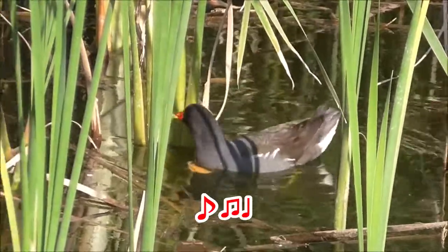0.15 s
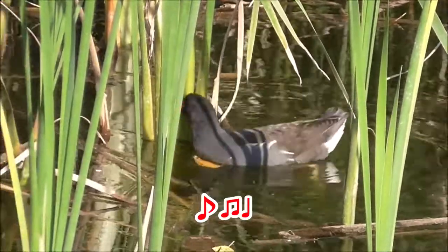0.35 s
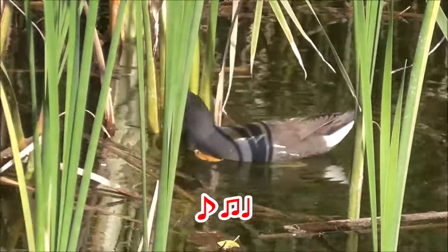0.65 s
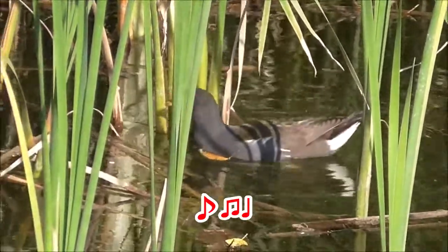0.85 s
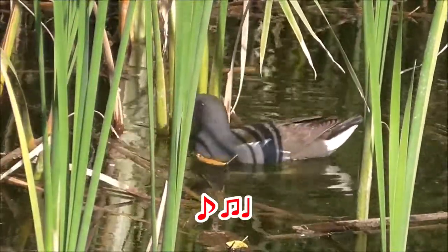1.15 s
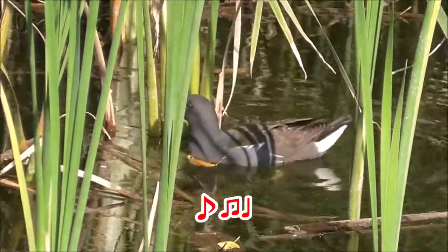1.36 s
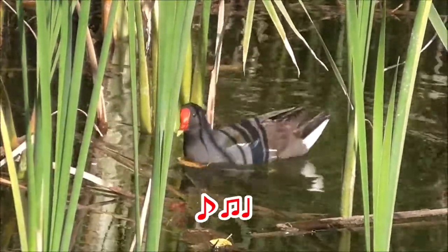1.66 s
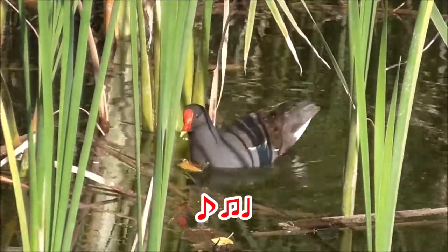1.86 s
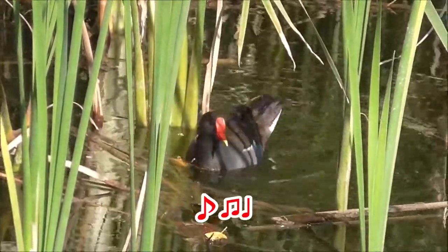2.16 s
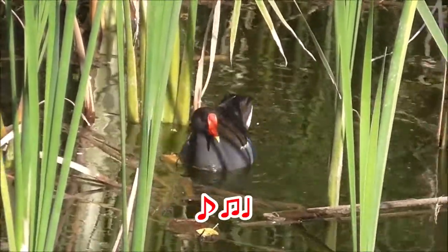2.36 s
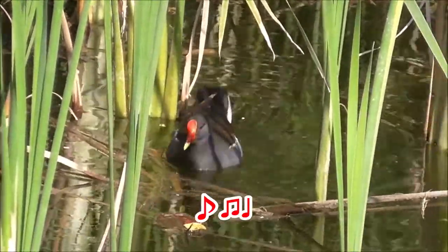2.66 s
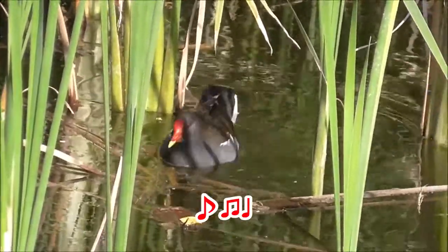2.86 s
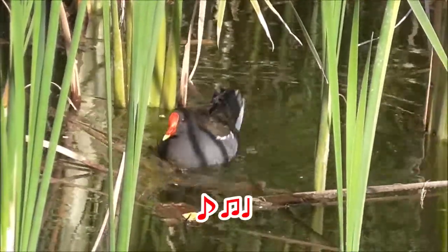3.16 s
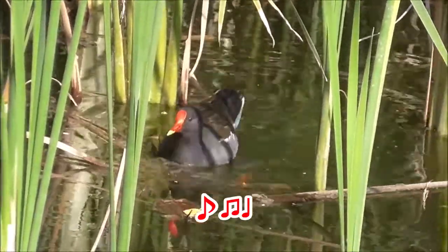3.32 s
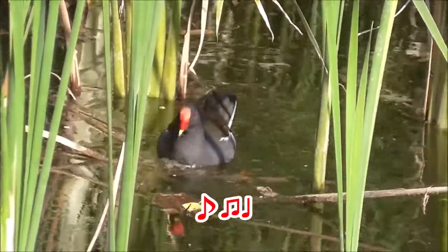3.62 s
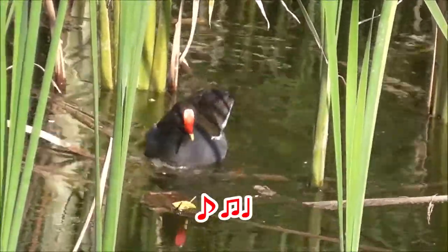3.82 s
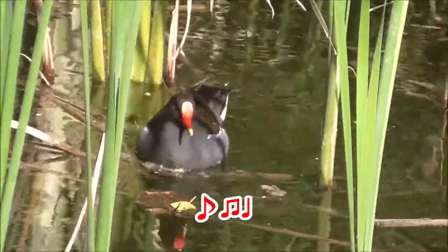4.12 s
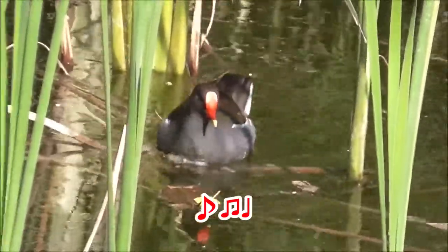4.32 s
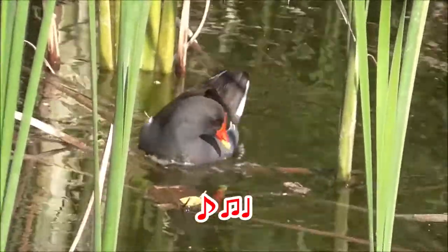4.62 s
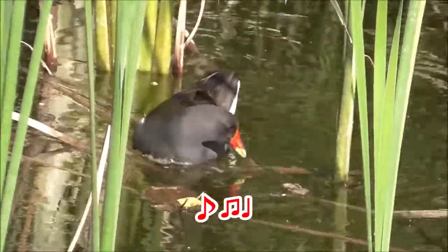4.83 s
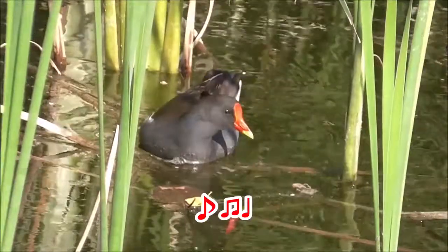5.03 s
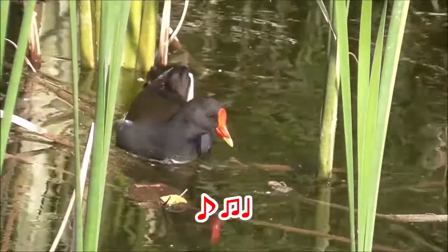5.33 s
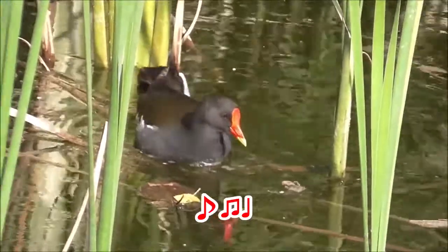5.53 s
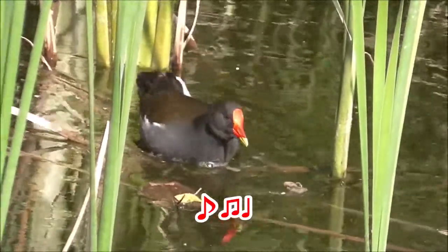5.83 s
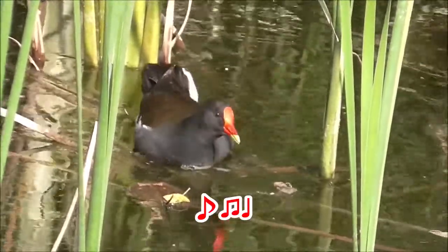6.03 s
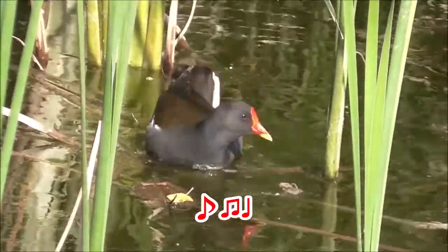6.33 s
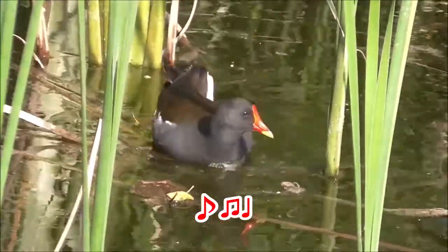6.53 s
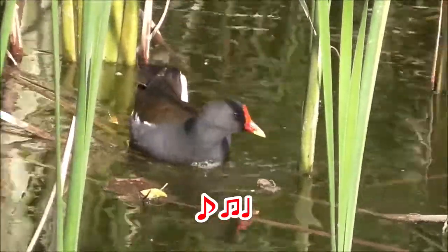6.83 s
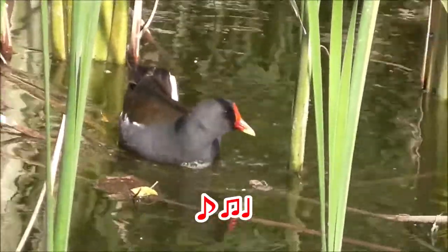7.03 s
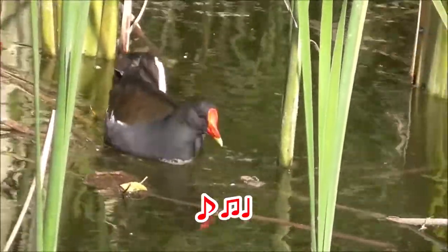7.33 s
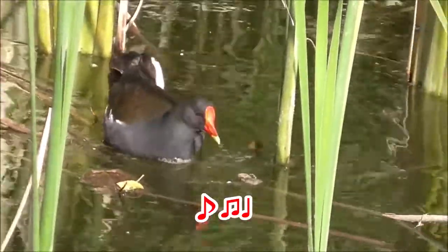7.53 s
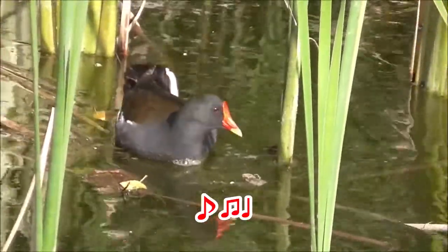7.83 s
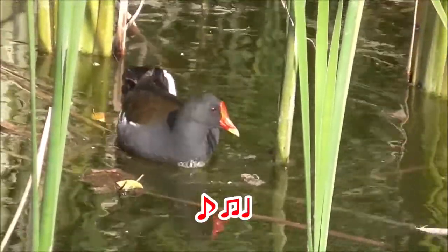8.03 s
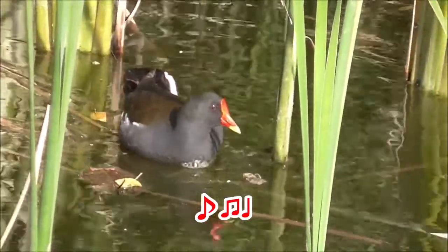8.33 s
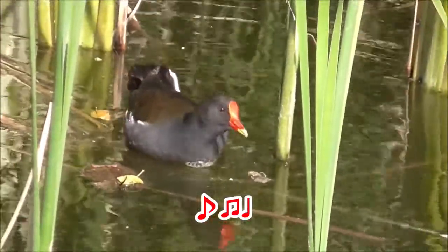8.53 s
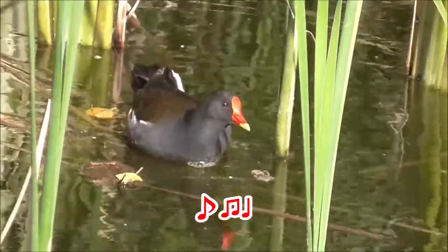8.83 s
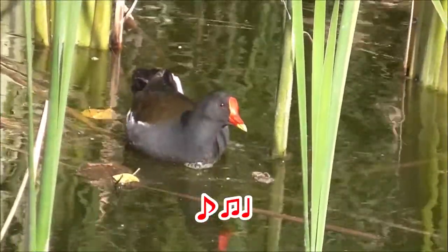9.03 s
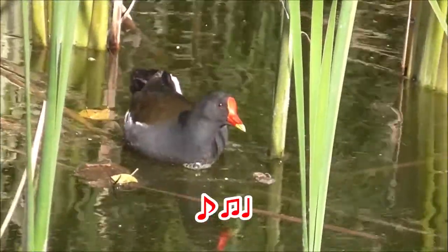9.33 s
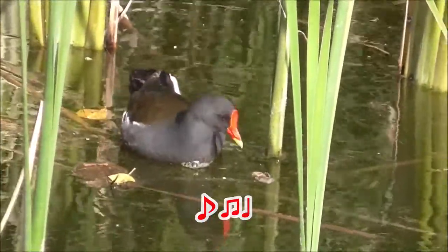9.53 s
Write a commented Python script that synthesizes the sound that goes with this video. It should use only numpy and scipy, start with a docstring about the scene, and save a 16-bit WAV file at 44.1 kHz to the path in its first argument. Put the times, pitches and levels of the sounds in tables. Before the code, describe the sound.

A reedy pond in open air, about 9.7 seconds, in stereo. Loud, steady insect hiss, strongest around 6-9 kHz, runs throughout over a soft low traffic murmur that slowly grows, with a faint wavering engine drone. Single crickets trill in overlapping stretches near 5-6 kHz, throbbing some thirty times a second. From 0.1 to 4.4 a small bird gives eighteen thin, arched whistles near 5 kHz, under a tenth of a second each, the first ones fainter. A close moorhen clucks, extremely short, throaty and upward-sliding, at 0.14, 1.74, 2.7, 2.97, 3.83, 4.56, 5.3, 6.02, 7.26 and 8.61; those at 3.83 and 4.56 push hardest, with brief hollow tails. Reeds scatter the calls slightly. Faint dry ticks come at 5.6 and 6.9. At 7.65 the camera takes a soft, low double knock with a tiny rattle. Insects and traffic continue to the end.

```python
"""A loud, steady insect chorus and a slowly growing murmur of far traffic, both shaped noise, run throughout.
Single crickets trill as throbbing tones, and at once a small bird starts a run of thin, arched whistles.
From the start to near the end a moorhen gives ten short clucks: a few uneven, upward-sliding cycles each.
After the song, two faint ticks of filtered noise come from the reeds, which also scatter the calls.
Late on, the camera takes a soft knock, made of short low tone bursts and a rattle of noise."""
import sys
import numpy as np
from scipy import signal
from scipy.fft import rfft, irfft, next_fast_len
from scipy.io import wavfile
from scipy.ndimage import uniform_filter1d

SR = 44100
rng = np.random.default_rng(int(sys.argv[2]) if len(sys.argv) > 2 else 0)


def inscribe(sig):
    """Save sig as 16-bit PCM at rate SR to the path in sys.argv[1].

    A 1-D sig is mono; a 2-D sig holds one channel per row.
    Samples are clipped to [-1, 1] before scaling.
    """
    pcm = np.round(np.clip(np.atleast_2d(sig).T, -1, 1) * 32767)
    wavfile.write(sys.argv[1], SR, pcm.astype(np.int16))


N = 426447

# Insect chorus, the balance of its noise: [pitch_hz, relative_level_db (per Hz)]
CHORUS_SPECTRUM = [(2900, -46), (3600, -39.5), (4300, -25), (5200, -15.5), (5750, -10), (6200, -5),
                   (7200, -4), (8000, 0.5), (8500, 0), (9300, -7), (10300, -16.5), (11200, -37.5),
                   (13200, -60), (15000, -33.5)]
# Far traffic, the balance of its noise: [pitch_hz, relative_level_db (per Hz)]
TRAFFIC_SPECTRUM = [(20, -33), (55, -12.5), (110, -5), (160, -4.5), (270, 0.5), (380, -4), (600, -3.5),
                    (850, -5), (1100, -10.5), (1500, -21), (2000, -27), (2800, -33), (5000, -42)]
# Drone of a far engine, its course over time: [time_s, pitch_hz, level_db]
DRONE_COURSE = [(0, 297, -47), (.4, 305, -44.5), (1.15, 306, -47), (2.1, 308, -64), (2.5, 313, -39),
                (2.9, 312, -57), (3.4, 310, -41.5), (3.8, 300, -54), (4.5, 291, -55), (5.3, 287, -49.5),
                (5.85, 291, -52), (6.6, 296, -54), (7.9, 309, -42.5), (8.3, 309, -50), (8.65, 298, -47),
                (9.05, 296, -44), (9.67, 298, -53)]
# How alike the two microphones hear far sounds: [pitch_hz, coherence (0-1)]
EAR_LIKENESS = [(50, .95), (600, .94), (1250, .72), (1700, .85), (2200, .55), (2900, .45), (4000, .82),
                (6000, .91), (7500, .82), (8300, .6), (8900, .32), (10000, .52), (11000, .75), (15000, .15)]
# How far the left microphone's waves run ahead of the right's: [pitch_hz, lead_radians]
LEFT_LEAD = [(100, 0), (800, -.25), (1500, -.05), (5000, .1), (7000, -.08), (8400, -.35), (8800, -.9),
             (9200, -1.8), (10500, -2.7), (11500, -2.9)]
# How much louder far sounds are on the left: [pitch_hz, left_minus_right_db]
SIDE_BALANCE = [(100, -1), (400, 1.5), (1100, 3.5), (1600, 0.8), (5500, 3.5), (7000, 0), (8000, 0),
                (8800, -3.5), (10500, 0.5), (15000, 0)]
# How long echoes in the reeds take to fall by 60 dB: [pitch_hz, fall_s]
REED_FADE = [(500, 0.099), (1700, 0.28), (3000, 0.41), (5000, 0.1)]
# Single crickets: [start_s, end_s, pitch_hz, pulses_per_s, level_db (before placing)]
CRICKET_TRILLS = [(0, 1.8, 5320, 31, -54), (0, 1.9, 5600, 30, -56), (1.55, 4.55, 5590, 30, -44),
                  (2, 4.5, 5622, 27, -48), (4.45, 6.2, 5890, 29, -46), (4.5, 6.3, 6220, 30, -48),
                  (4.9, 8.9, 5465, 30, -56), (6.3, 9.15, 5700, 31, -48.5), (7.8, 9.5, 4810, 30, -58)]
# Faint ticks in the reeds: [start_s, level_db]
REED_TICKS = [(5.62, -55), (6.925, -48)]
# Knocks on the camera: [middle_s, pitch_hz, half_length_s, level_db (before placing)]
CAMERA_KNOCKS = [(7.651, 198, 0.0037, -25), (7.6646, 200, 0.0033, -15), (7.684, 230, .005, -32)]
# The small bird's notes: [start_s, length_s, climb_s, top_pitch_hz, level_db (before shaping and placing),
# ledge_swell_db, crest_swell_db]
SONG_NOTES = [(0.103, 0.08, .036, 4720, -51.5, -2, 8), (0.322, 0.073, 0.039, 4850, -43.5, 1, 3),
              (0.753, .062, 0.031, 4950, -47, 6, -6), (0.948, 0.08, .034, 5040, -44, 0, 7),
              (1.158, 0.086, 0.04, 5160, -43.5, 0, 9.5), (1.383, 0.083, 0.041, 5200, -42.5, 3, 10.5),
              (1.605, 0.078, .042, 5300, -41, 6, 2), (1.832, 0.093, 0.04, 5300, -39, 3, 3),
              (2.074, 0.081, 0.032, 5250, -39.5, 1, 1), (2.333, 0.11, 0.027, 5160, -44, 0, 6.5),
              (2.578, 0.082, .039, 5300, -41, 3, 1), (2.8, 0.078, .035, 5290, -40, -1, 5),
              (3.024, .095, .03, 5270, -41, -2, 5.5), (3.288, 0.082, .032, 5280, -40, -2, 3),
              (3.535, 0.089, .035, 5230, -41.5, 0, 6), (3.808, 0.086, 0.038, 5260, -40.5, 3, 5),
              (4.066, 0.095, 0.046, 5260, -41.5, 7, 4), (4.337, 0.075, .038, 5220, -40, 2, 6)]
# Course of one note, with a ledge just before the flip at half way:
# [progress (0-1), pitch_share_of_top, level_db (stretched in the first notes)]
NOTE_ARCH = [(0, .66, -18), (.16, .77, -6), (.3, .845, -1), (.38, .872, -.5), (.46, .885, -.5),
             (.5, .965, -2), (.55, .995, 1), (.62, 1.0, 1.5), (.75, .96, .5), (.87, .83, -4), (1, .63, -18)]
# Moorhen clucks; the parts are set against the cluck's own level: [start_s, push (0-1), length_s,
# level_db (before placing), second_harmonic_db (before swell and throat), third_harmonic_db, hiss_db,
# trailing_hoot_db, opening_catch_db, scatter_from_reeds_db]
MOORHEN_CLUCKS = [(0.1422, 0.12, 0.012, -26, -8.5, -20, -38, -25, -21, -8),
                  (1.7437, 0.16, 0.0098, -26, 2, -21, -35, -25, -12, -14),
                  (2.7008, 0.1, 0.013, -25.5, -3, -14, -30, -25, -10, -8),
                  (2.9698, 0.08, 0.012, -25.5, -4, -20, -33, -22, -10, -8.5),
                  (3.8332, 0.86, 0.0078, -22, -2.5, -22, -27, -8, -12, -9),
                  (4.5597, 1, 0.0079, -23.5, -2.5, -24, -31, -5, -10, -10),
                  (5.3024, 0.14, 0.0098, -22.5, -2.5, -15, -26, -25, -11, -11),
                  (6.0178, 0.46, 0.0088, -21, 0, -14, -25, -9, -10, -11.5),
                  (7.2617, 0.1, .011, -24.3, -3.5, -19, -33, -24, -8, -8.5),
                  (8.6108, 0.03, .012, -24, -5, -21, -35, -26, -17, -8)]


def amp(db):
    """Turns decibels into gain."""
    return 10 ** (np.asarray(db) / 20)


def evened(x):
    """Scales a sound to an rms of 1."""
    return x / np.sqrt(np.mean(x ** 2) + 1e-20)


def read(points, hz):
    """Reads a curve over pitch, on a log-frequency axis."""
    f, value = np.transpose(points)
    return np.interp(np.log(hz + 1), np.log(f + 1), value)


def add(mix, s, sound):
    """Mixes a sound in at s seconds."""
    part = mix[max(round(s * SR), 0):][:len(sound)]
    part += sound[:len(part)]


def drift(rate, size):
    """Smooth random wander of rms about 1; a higher rate in Hz makes it move faster."""
    n = next_fast_len(max(size, SR))
    f = np.fft.rfftfreq(n, 1 / SR)
    smooth = rfft(rng.standard_normal(n)) * np.exp(-(f / rate) ** 2)
    return evened(irfft(smooth, n))[:size]


def tone(hz):
    """Sine wave whose pitch follows hz sample by sample."""
    return np.sin(2 * np.pi * np.cumsum(hz) / SR)


def band(x, low_hz, high_hz, order=2):
    """Keeps only the part of a sound between two pitches."""
    return signal.lfilter(*signal.butter(order, [low_hz, high_hz], "bandpass", fs=SR), x)


def hiss(size, low_hz, high_hz, order):
    """Band of random noise with an rms of 1."""
    return evened(band(rng.standard_normal(size), low_hz, high_hz, order))


def placed(x, left_db):
    """Puts a sound to the left (positive) or right by a level difference."""
    return x * amp([[left_db / 2], [-left_db / 2]])


def distant(spectrum, patchy_db):
    """Many far sources merged into noise with drifting patches, as the two microphones hear it."""
    frames, hz = N // 512 + 5, np.fft.rfftfreq(2048, 1 / SR)
    a, b, c, d, patches = rng.standard_normal((5, frames, len(hz)))
    # blur the patches over time, then over pitch
    patches = uniform_filter1d(patches, size=8, axis=0)
    patches = evened(uniform_filter1d(patches, size=16, axis=1))
    # the right side shares part of the left's noise and has some of its own
    same = np.clip(read(EAR_LIKENESS, hz), 0, 1)
    left = a + 1j * b
    right = same * left + np.sqrt(1 - same ** 2) * (c + 1j * d)
    right = right * np.exp(-1j * read(LEFT_LEAD, hz))
    side = amp(read(SIDE_BALANCE, hz) / 2)
    z = np.array([left * side, right / side])
    z = z * amp(read(spectrum, hz) + patchy_db * patches)
    noise = signal.istft(z.swapaxes(1, 2), nperseg=2048, noverlap=1536)[1]
    return evened(noise[:, :N])


def reeds(x):
    """Stems and banks scatter a sound: sparse echoes, partly shared by both sides, dying by band."""
    size = SR // 2
    # about 2500 echoes a second, none in the first 4 ms
    taps = rng.standard_normal((3, size)) * (rng.random((3, size)) < 2500 / SR)
    taps = (taps[:2] + 4.8 * taps[2]) * (np.arange(size) > .004 * SR)
    hz, t, z = signal.stft(taps, SR, nperseg=256)
    near_stems = 1 + 1.9 * np.exp(-t / 0.012)
    z = z * near_stems * amp(-60 * t / read(REED_FADE, hz)[:, None])
    tail = signal.istft(z, SR, nperseg=256)[1]
    tail = tail / np.linalg.norm(tail[0])
    return signal.oaconvolve(x[None], tail, axes=1)[:, :len(x)]


def engine_drone(wander_hz=1.245, flicker_db=1.5):
    """A far engine holds one wavering note, a sine that swells and fades."""
    s, pitch_hz, level_db = np.transpose(DRONE_COURSE)
    t = np.arange(N) / SR
    hz = np.interp(t, s, pitch_hz) + wander_hz * drift(9.3, N)
    return amp(np.interp(t, s, level_db) + flicker_db * drift(7.5, N)) * tone(hz)


def traffic(start_db=-39.5, rise_db_per_s=0.1467, swell_db=0.5):
    """A low murmur of far roads slowly grows, its deepest rumble faster than the rest."""
    rumble_hz, rumble_start_db, rumble_rise_db_per_s = 130, -2.5, 0.39
    t = np.arange(N) / SR
    level_db = start_db + rise_db_per_s * t + swell_db * drift(1.0, N)
    murmur = distant(TRAFFIC_SPECTRUM, patchy_db=1.11)
    rumble = signal.filtfilt(*signal.butter(2, rumble_hz, fs=SR), murmur)
    rumble_gain = amp(rumble_start_db + rumble_rise_db_per_s * t)
    return amp(level_db) * (murmur - rumble + rumble_gain * rumble) + engine_drone()


def chorus(level_db=-27, swell_db=0.078):
    """Countless insects blend into a steady high hiss."""
    return amp(level_db + swell_db * drift(4.7, N)) * distant(CHORUS_SPECTRUM, patchy_db=0.64)


def crickets(wander_hz=20, pulse_depth=.5, sag_hz=12, direct_db=-1.5, echo_db=-4):
    """Nearer insects stand out of the chorus; each tone throbs and bends with every wing stroke."""
    out = np.zeros(N)
    for start, end, pitch_hz, strokes, level_db in CRICKET_TRILLS:
        size = int((end - start) * SR)
        stroke = 2 * np.pi * np.cumsum(strokes * (1 + 0.077 * drift(6, size))) / SR
        hz = pitch_hz + wander_hz * drift(30.8, size) + sag_hz * np.cos(stroke)
        throb = 1 + pulse_depth * np.sin(stroke)
        trill = amp(level_db) * evened(throb * tone(hz))
        add(out, start, trill * signal.windows.tukey(size, .25))
    return placed(out, left_db=1.5) * amp(direct_db) + amp(echo_db) * reeds(out)


def ticks(t60=.02, low_hz=1500, high_hz=4000, echo_db=-5):
    """A dry stem snaps lightly: noise that falls by 60 dB in t60 seconds, scattered by the reeds."""
    out, t = np.zeros(N), np.arange(SR // 20) / SR
    for s, level_db in REED_TICKS:
        add(out, s, amp(level_db - 60 * t / t60) * hiss(len(t), low_hz, high_hz, order=2))
    return out + amp(echo_db) * reeds(out)


def knock_burst(t, hz, half_s):
    """A tone that swells and fades around time zero, a push and its rebound."""
    return np.exp(-np.abs(t / half_s) ** 1.7) * np.sin(2 * np.pi * hz * t)


def knocks(case_hz=460, case_db=-8, tap_hz=1350, tap_db=-20, rattle_db=-20, rattle_t60=.13):
    """A soft push and rebound of the camera body, then a short rattle of its case."""
    out, t = np.zeros(N), np.arange(-SR // 50, SR // 8) / SR
    for s, hz, half_s, level_db in CAMERA_KNOCKS:
        body = knock_burst(t, hz, half_s)
        case = amp(case_db) * knock_burst(t, case_hz, .0022)
        tap = amp(tap_db) * knock_burst(t, tap_hz, .0009)
        rattle = hiss(len(t), 170, 900, order=4) * amp(rattle_db - 60 * t / rattle_t60)
        rattle *= np.clip(t / .002, 0, 1)  # silent until the middle of the knock
        add(out, s + t[0], amp(level_db) * (body + case + tap + rattle))
    return placed(out, left_db=0.5)


def whistle(s, length, climb, top_hz, level_db, ledge_db, crest_db, waver=.005, flutter_db=1.7):
    """One whistle climbs, leans on a ledge, flips up to a rounded crest and drops away."""
    # every note drops in the same time, so a longer one dwells on its top
    fall_s = 0.022
    # at the start of the song the arch's decibels are stretched, so the ends of notes are fainter
    hesitant, warm_up_s = 2.4, 1.4
    at, pitch, loud_db = np.transpose(NOTE_ARCH)
    t = np.arange(int(length * SR)) / SR
    progress = np.interp(t, [0, climb, length - fall_s, length], [0, .5, .75, 1])
    ledge = np.interp(progress, [.28, .38, .45, .49], [0, 1, 1, 0])
    crest = np.interp(progress, [.46, .52, .7, .8], [0, 1, 1, 0])
    hz = top_hz * np.interp(progress, at, pitch) * (1 + waver * drift(240, len(t)))
    stretch = np.interp(s, [0, warm_up_s], [hesitant, 1])
    arch_db = stretch * np.interp(progress, at, loud_db)
    flutter = flutter_db * drift(110, len(t))
    level = amp(level_db + arch_db + ledge_db * ledge + crest_db * crest + flutter)
    return level * signal.windows.tukey(len(t), .1) * tone(hz)


def songbird(direct_db=-.5, water_db=-13, echo_db=-4):
    """A run of whistles, each mirrored by the water a moment later and scattered by the reeds."""
    soonest_s, latest_s = 0.001977, .005  # delay of the mirror image in the water
    out = np.zeros(N)
    for s, *shape in SONG_NOTES:
        note = whistle(s, *shape)
        add(out, s, note)
        add(out, s + rng.uniform(soonest_s, latest_s), amp(water_db) * note)
    return amp(direct_db) * placed(out, left_db=-2.5) + amp(echo_db) * reeds(out)


def cluck(lead_s, push, length, level_db, second_db, third_db, air_db, hoot_db, catch_db,
          hoot_t60=0.11, rasp_db=-14, rasp_hz=650, jitter=0.023, shimmer=0.16):
    """A catch in the throat, then a few uneven cycles that slide upward with a little rasp and shut off."""
    t = np.arange(SR // 10) / SR - lead_s
    since = np.maximum(t, 0)

    # the pitch slides up from a low start and levels off; a harder push slides higher
    start_hz, slide_s, gentle_hz, hard_hz = 662, 0.0057, 881, 1005
    end_hz = gentle_hz + push * (hard_hz - gentle_hz)
    hz = end_hz + (start_hz - end_hz) * np.exp(-since / slide_s)
    hz = hz * (1 + jitter * drift(310, len(t)))
    phase = 2 * np.pi * np.cumsum(hz) / SR

    # the voice opens fast, holds for its length and shuts
    attack_s, shut_steepness = 0.0032, 2.5
    opening = np.sin(np.pi / 2 * np.minimum(since / attack_s, 1)) ** 2

    def held(seconds):
        """Loudness of a voice that shuts after some seconds."""
        return opening * np.exp(-(since / seconds) ** shut_steepness)

    hoot = (opening - held(length)) * amp(hoot_db - 60 * np.maximum(t - length, 0) / hoot_t60)
    # the throat catches softly for a cycle or two around the moment the voice opens
    catch_s, catch_second_db = .002, -5
    catch = amp(catch_db) * np.exp(-(t / catch_s) ** 2)
    # the second harmonic swells later and outlasts the first; the throat resonates on it
    second_lasts, swell_db_per_s, throat_db = 1.15, 400, 0.9
    swell_db = swell_db_per_s * np.minimum(t - length, 0)
    second = amp(throat_db + second_db + swell_db) * held(second_lasts * length)
    # the third harmonic flashes only early in the cluck
    flash_at_s, flash_width_s = 0.0045, 0.004
    flash = opening * np.exp(-((t - flash_at_s) / flash_width_s) ** 2)
    harmonics = [held(length) + hoot + catch,
                 second + amp(catch_second_db) * catch,
                 amp(third_db) * flash]
    voice = np.zeros(len(t))
    for k, level in enumerate(harmonics, 1):
        voice += level * (1 + shimmer * drift(340, len(t))) * np.sin(k * phase)

    # a little hiss rides on the voice and lingers after it
    air_low_hz, air_high_hz, air_t60 = 1590, 2940, 0.14
    air = hiss(len(t), air_low_hz, air_high_hz, order=3)
    air *= amp(air_db - 60 * since / air_t60) * (opening + catch)
    rasp = amp(rasp_db) * (held(length) + catch) * drift(rasp_hz, len(t)) * np.sin(2 * phase)
    return amp(level_db) * (voice + air + rasp)


def moorhen(scatter_low_hz=1150, scatter_high_hz=2050):
    """The clucks, close by; thin stems scatter mostly their second harmonic, anew for each call."""
    lead_s = .005  # room for the catch before the voice opens
    bank_echo_s, bank_echo_db = 0.018, -13  # the near bank returns each cluck
    out = np.zeros((2, N))
    for s, *shape, scatter_db in MOORHEN_CLUCKS:
        call = np.pad(cluck(lead_s, *shape), (0, SR // 2))
        scattered = band(call, scatter_low_hz, scatter_high_hz)
        heard = placed(call, left_db=2.0) + amp(scatter_db) * reeds(scattered)
        bank_echo = amp(scatter_db + bank_echo_db) * scattered
        for side, sound in zip(out, heard):
            add(side, s - lead_s, sound)
            add(side, s - lead_s + bank_echo_s, bank_echo)
    return out


def scene():
    """Everything around the pond, from the background to the moorhen."""
    return traffic() + chorus() + crickets() + ticks() + knocks() + songbird() + moorhen()


def record(dry, edge_hz=15800):
    """The recorder's band limit: a steep filter removes what lies above the edge."""
    low_pass = signal.firwin(511, edge_hz, window=("kaiser", 9), fs=SR)
    return signal.oaconvolve(dry, low_pass[None], "same")


dry = scene()
out = record(dry)
inscribe(out)
```